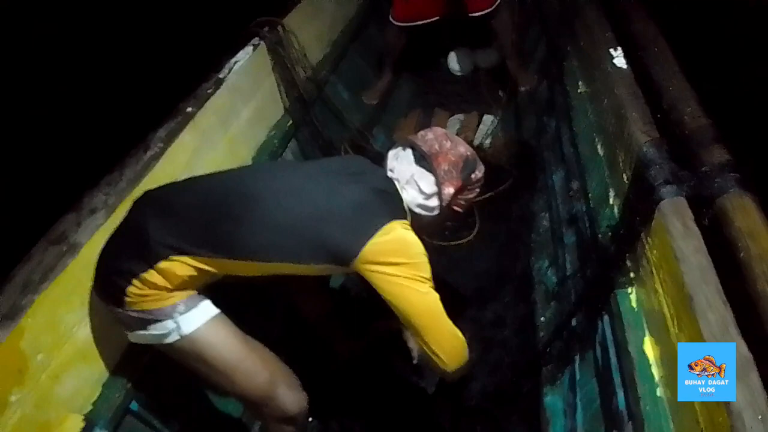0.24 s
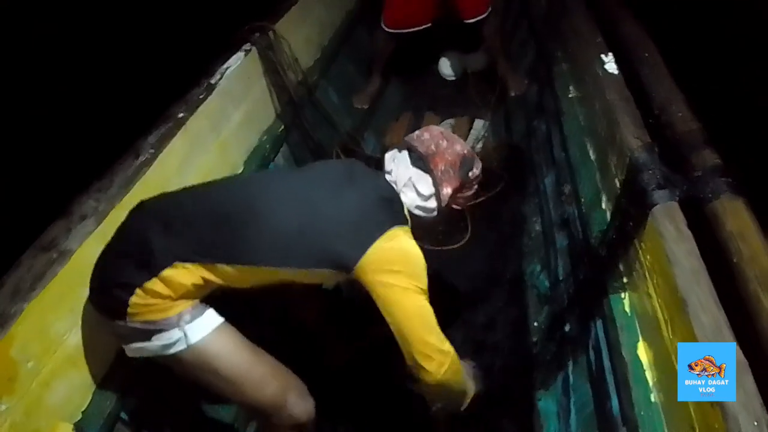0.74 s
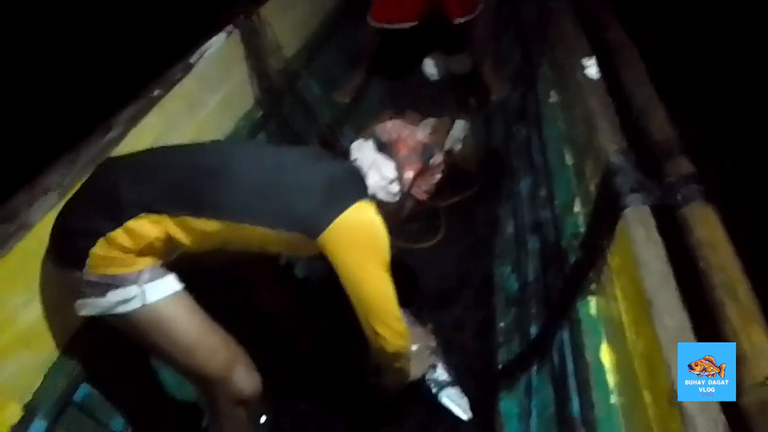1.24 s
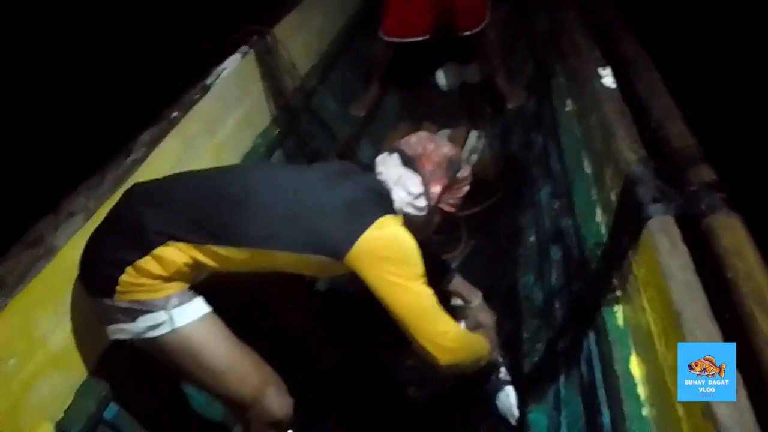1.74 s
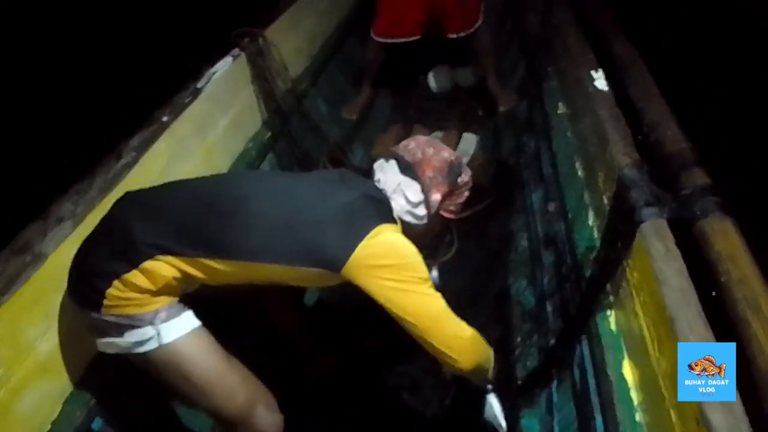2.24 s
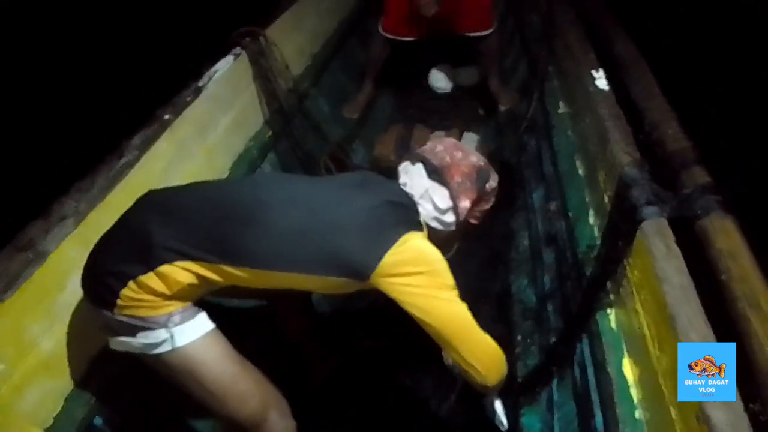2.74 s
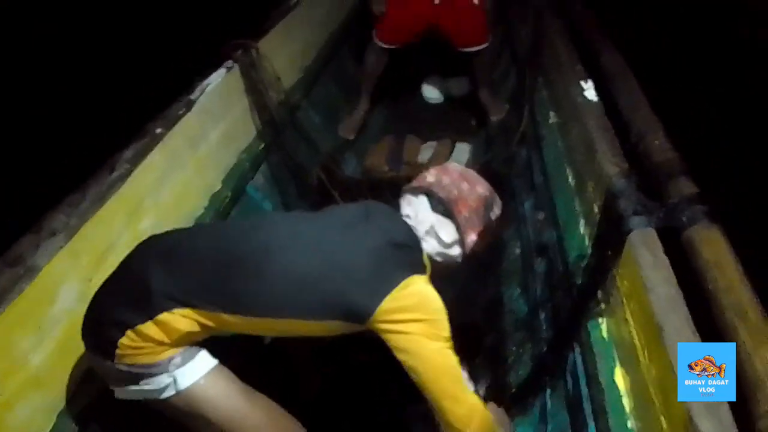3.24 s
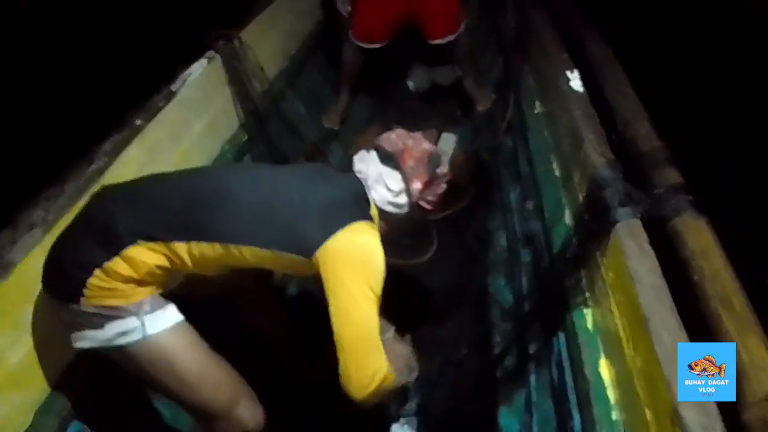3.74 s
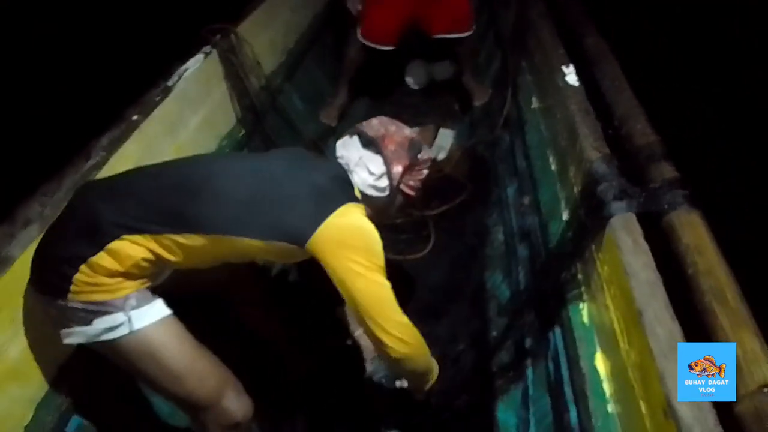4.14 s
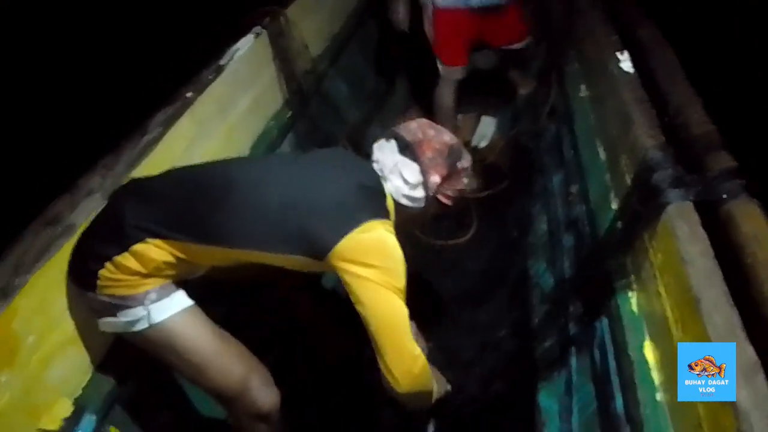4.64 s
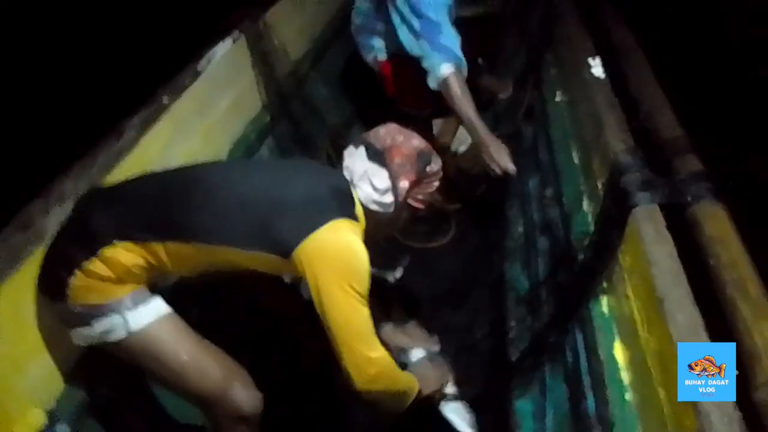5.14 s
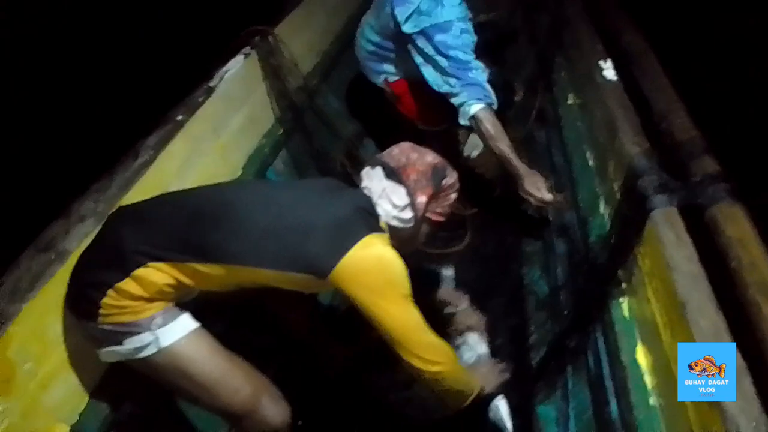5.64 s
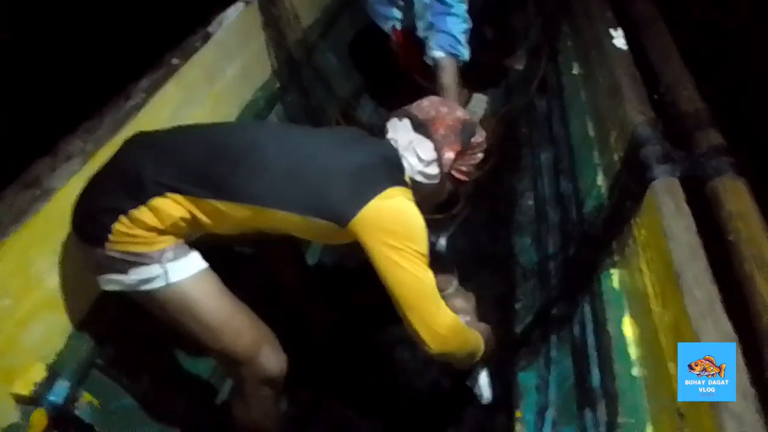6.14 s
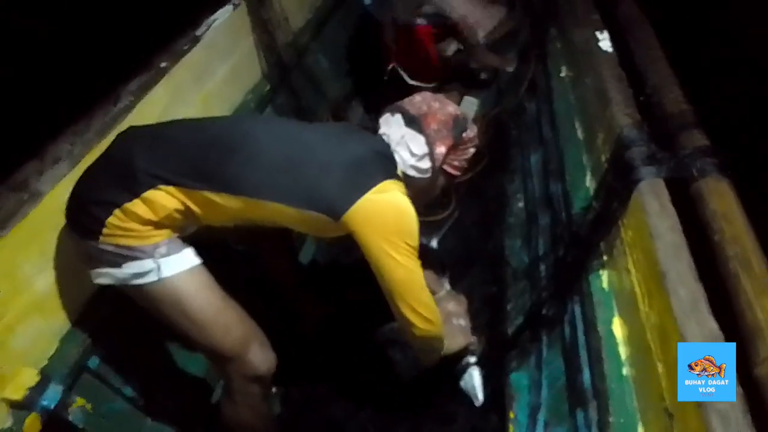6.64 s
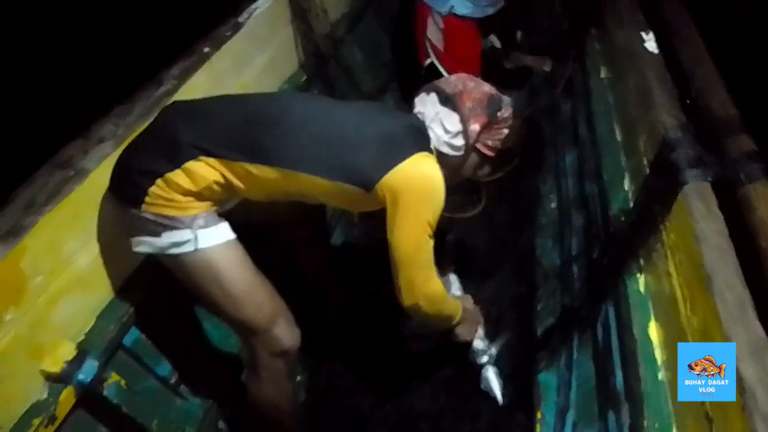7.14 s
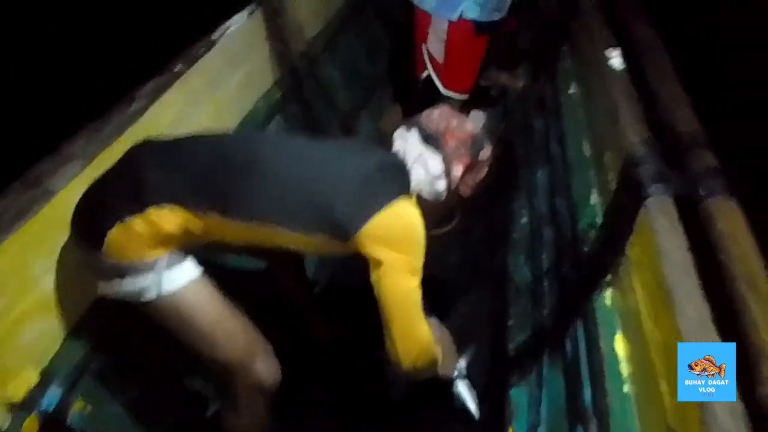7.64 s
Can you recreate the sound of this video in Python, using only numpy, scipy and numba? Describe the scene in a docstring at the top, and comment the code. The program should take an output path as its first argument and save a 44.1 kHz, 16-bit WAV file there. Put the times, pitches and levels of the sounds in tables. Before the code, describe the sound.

Close, slightly boxy mono sound of seawater running off a net inside a small boat. Short splashes alternate with sparse drips, fine bubbles and crackling spray. Later the water pours more heavily while low buffets knock the microphone, then hollow bubbles gurgle and another bright splash falls. Uneven sea and gust rumble lies below, with constant faint hiss.

```python
"""A drop plinks over a trickle, then splash after splash streams off a wet net hauled up a small wooden boat.
The stream is filtered noise, clicks and tiny bubbles, brightened by a camera housing's resonances;
plinks and glugs are gliding damped tones, and single drops add a splat and a bright tick.
Below, noise makes the sea and gusts rumble, and short low tones buffet the microphone port;
a faint whine sounds once, briefly, and a steady hiss lies under it all."""
import sys
import numpy as np
from scipy import signal
from scipy.io import wavfile
from scipy.ndimage import uniform_filter1d
from numba import njit

SR = 44100
rng = np.random.default_rng(int(sys.argv[2]) if len(sys.argv) > 2 else 0)


def generate_wav(sig):
    """Save sig (samples, or channels by samples) to the path in sys.argv[1] as 16-bit PCM at SR."""
    pcm = np.round(np.clip(np.atleast_2d(sig).T, -1, 1) * 32767).astype(np.int16)
    wavfile.write(sys.argv[1], SR, pcm)


N = 347508
FRAME = 512  # spectral frame in samples


def undb(db):
    """Amplitude factor of a level in dB."""
    return 10 ** (np.asarray(db) / 20)


def unit(x):
    """Scale x to an RMS of 1."""
    return x / np.sqrt(np.mean(x ** 2))


def curve(table, s):
    """Columns of a table, interpolated at times s."""
    times, *columns = np.transpose(table)
    return [np.interp(s, times, c) for c in columns]


def slope(points, hz):
    """Level in dB along (f/Hz, level/dB) points, straight over log pitch."""
    f, db = np.transpose(points)
    return np.interp(np.log(hz + 1), np.log(f), db)


def walk(rate_hz):
    """Random levels, each held for 1 / rate_hz seconds and slewed into the next; spread near 1."""
    hold = int(SR / rate_hz)
    steps = np.repeat(rng.standard_normal(N // hold + 1), hold)
    return uniform_filter1d(steps, hold // 2 + 1)[:N]


def patches(shape, wide, long):
    """Random field over pitch and time: bands that stay strong or weak for a while (sizes in bins, frames)."""
    field = uniform_filter1d(rng.standard_normal(shape), int(wide), axis=0)
    field = uniform_filter1d(field, int(long), axis=1)
    return unit(uniform_filter1d(field, int(long) // 3, axis=1))


def colour(x, gain_db, size):
    """Filter x by gain_db(hz, s), which may move in time."""
    overlap = 3 * size // 4
    hz, s, z = signal.stft(x, SR, nperseg=size, noverlap=overlap)
    shaped = z * undb(gain_db(hz[:, None], s))
    return signal.istft(shaped, SR, nperseg=size, noverlap=overlap)[1][:N]


@njit
def ring(n, start, omega, decay, rise, glide, size):
    """Damped tones that swell for a moment, glide in pitch and fade."""
    out = np.zeros(n)
    for k in range(len(start)):
        # the envelope is a slow decay minus a faster one
        slow, fast, w, phase, i = size[k], size[k], omega[k], 0., start[k]
        while slow > .003 * size[k] and i < n:
            out[i] += (slow - fast) * np.sin(phase)
            phase += w
            w *= glide[k]
            slow *= decay[k]
            fast *= rise[k]
            i += 1
    return out


def bubbles(s, hz, db, cycles, glide, rise_share):
    """Bubbles decay at 60 dB per so many cycles, while pitch changes by the share glide; onset is faster."""
    length = cycles * SR / hz
    decay = np.exp(-np.log(1000) / length)
    start = (s * SR).astype(np.int64)
    omega = 2 * np.pi * hz / SR
    return ring(N, start, omega, decay, decay ** (1 / rise_share), (1 + glide) ** (1 / length), undb(db))


def bursts(s, db, tick_s, tail_db, tail_s, lo_hz, hi_hz):
    """A click, then noise in the same band that drops fast and trails off."""
    hits = np.zeros(N)
    hits[(s * SR).astype(int)] = undb(db)
    tick = signal.lfilter([1], [1, -np.exp(-1 / (tick_s * SR))], hits)
    tail = signal.lfilter([1], [1, -np.exp(-1 / (tail_s * SR))], hits)
    band = signal.butter(2, [lo_hz, hi_hz], "band", fs=SR, output="sos")
    noise = unit(signal.sosfilt(band, rng.standard_normal(N)))
    return signal.sosfilt(band, hits) + (tick + undb(tail_db) * tail) * noise


def housing_db(hz):
    """The camera housing resonates and so lifts a few fixed bands."""
    # resonances: f/Hz, width/Hz, lift/dB
    resonances = [(1300, 190, 13), (1828, 250, 6.5), (2510, 86, 3), (4216, 850, 8), (6080, 1950, 5)]
    return sum(db / (1 + (2 * (hz - f) / width) ** 4) for f, width, db in resonances)


def hiss():
    """A steady white noise floor."""
    return undb(-72.5) * rng.standard_normal(N)


def rumble(gust_db=2.5, patchy_db=4.5):
    """Sea and gusts: low noise whose level flutters quickly and whose bands shift in patches."""
    # course of the rumble: t/s, level/dB, upper rumble trim/dB
    course = [(0.0, -41, -22), (0.35, -45.5, -25), (0.57, -28.5, -35), (0.75, -42, -15.5), (1.73, -38, -34),
              (2.02, -46.5, -33), (2.5, -36.5, -23.5), (3.27, -58.5, -15), (4.03, -40, -27.5),
              (4.6, -47, -20), (4.94, -40, -1), (5.29, -37.5, -26.5), (5.44, -30.5, -9), (5.7, -25, -7),
              (5.95, -31, -16), (6.36, -33.5, -12), (6.52, -33, -25), (7.07, -32.5, -28),
              (7.42, -42.5, -1.5), (7.72, -43, -37), (7.82, -32.5, -11)]
    # spectrum of the sea: f/Hz, level/dB
    sea = [(20, 5.5), (32, -16), (55, 5), (100, -2.5), (170, -7.5), (450, -3.5), (600, -44)]
    flutter = walk(30) + .5 * walk(16)
    raw = rng.standard_normal(N) * undb(gust_db * flutter)

    def gain_db(hz, s):
        level_db, upper_db = curve(course, s)
        # the deepest swell grows less than the gusts
        deep = np.clip((70 - hz) / 30, 0, 1) * (-47.5 - level_db) * 0.72
        upper = np.clip((hz - 170) / 100, 0, 1) * upper_db
        shifts = patchy_db * patches((len(hz), len(s)), 2., 4.)
        return slope(sea, hz) + deep + upper - 60 * (hz > 600) + shifts

    level_db = curve(course, np.arange(N) / SR)[0]
    return undb(level_db) * unit(colour(raw, gain_db, size=4 * FRAME))


def buffets():
    """Hard buffets on the microphone port: low tones of a few cycles that sag in pitch."""
    # buffets: t/s, strength/dB, starting f/Hz, cycles to fade
    hits = [(1.732, -16, 106, 7), (2.476, -19.5, 123, 7), (4.871, -12.5, 337, 6.1), (5.036, -17, 346, 7.6),
            (5.104, -18.5, 115, 2.8), (5.385, -18, 234, 15), (5.426, -17, 320, 14), (5.621, -3.5, 264, 2.6),
            (6.022, -18.5, 400, 15), (6.04, -12.5, 148, 3.6), (6.054, -8, 192, 4.3), (6.158, -13, 143, 4.2),
            (6.248, -15, 213, 12.5), (6.333, -12, 136, 8.7), (6.34, -7, 260, 9), (6.424, -12.5, 136, 3.8)]
    s, db, hz, cycles = np.transpose(hits)
    return bubbles(s, hz, db, cycles, -0.24, 0.25)


def whine():
    """One faint, brief thin tone of steady pitch that swells and fades."""
    # tone: t/s, f/Hz, strength/dB, cycles to fade
    tone = [(3.059, 1857, -45.5, 1000)]
    return bubbles(*np.transpose(tone), 0., 0.74)


def glugs():
    """Pockets of trapped air that ring longer and bend in pitch."""
    # glugs: t/s, strength/dB, starting f/Hz, cycles to fade, pitch rise as a share
    pockets = [(0.419, -34, 1150, 43, 0.6), (6.51, -35, 785, 68, 0.23), (6.69, -34.5, 667, 80, -0.05),
               (6.825, -29, 1230, 45, 0.6), (6.95, -48, 646, 69, 0.57), (7.0, -27, 1244, 47, 0.2),
               (7.065, -30, 1142, 89, 0.11), (7.814, -31, 395, 70, -0.16)]
    s, db, hz, cycles, glide = np.transpose(pockets)
    return bubbles(s, hz, db, cycles, glide, 0.23)


def drops(splat_db=-23.5, bell_db=-5.0):
    """Each drop is a dull splat that rings the housing, a bright tick of spray and one bubble."""
    # drops: t/s, level/dB (splat and bubble are trimmed from it), bubble f/Hz, tick re level/dB
    falls = [(0.024, -19.5, 3970, -15), (0.084, -22, 914, -34), (0.6, -52, 4460, 15), (0.727, -47, 1310, 7),
             (0.842, -24.5, 4030, -20.5), (0.9502, -11.5, 2420, -14.5), (0.9955, -22, 1370, 2),
             (1.003, -25, 1350, -18), (1.1658, -23.5, 1300, -11.5), (1.944, -22.5, 1315, -33),
             (2.0547, -29.5, 1540, -49), (2.616, -38, 1310, -3.5), (2.713, -22.5, 2420, -3),
             (2.8308, -26.5, 1530, -1), (2.937, -32, 1860, -18), (2.9661, -29.5, 1490, -14),
             (3.3787, -43.5, 1870, 0.5), (3.495, -26, 1800, -15), (3.561, -22.5, 1760, -22),
             (3.8045, -18, 4080, -9), (3.8336, -15.5, 4840, -23), (3.927, -26.5, 4200, -11.5),
             (4.255, -32, 1310, -7), (4.4629, -25.5, 4360, -13), (4.719, -21.5, 1790, -30),
             (4.9813, -18, 1295, -22), (5.224, -30.5, 1800, -23), (5.9786, -20.5, 1290, -3.5),
             (6.126, -24.5, 2570, -1.5), (6.183, -25, 1100, -31), (6.3727, -21, 1810, -12),
             (7.187, -28.5, 1290, 2), (7.289, -12.5, 1390, -7.5), (7.334, -20, 2580, 0),
             (7.7075, -27, 1330, -0.5), (7.783, -19.5, 1370, -44)]
    s, db, hz, tick_db = np.transpose(falls)
    splats = bursts(s, db + splat_db, 0.0033, -11.5, 0.044, 1200, 4230)
    housed_splats = colour(splats, lambda hz, s: housing_db(hz), size=FRAME)
    ticks = bursts(s, db + tick_db, 0.00026, -6.0, 0.0072, 3900, 8970)
    bells = bubbles(s, hz, db + bell_db, 64.0, 0.024, 0.12)
    return housed_splats + ticks + bells


def water(s):
    """Flow level, slosh and fine spray in dB: powers of the trickle and an arch per splash add up."""
    # trickle between splashes: t/s, level/dB, heavy slosh trim/dB, fine spray trim/dB
    trickle = [(0.06, -33.5, -17.5, -13.5), (0.33, -48, -20.5, -4.5), (0.68, -63.5, -1, -0.5),
               (0.9, -51.5, -5, -18), (1.23, -51, -17, -3.5), (1.5, -51, -9, -18), (2.2, -70.5, -1, -10),
               (2.6, -58.5, -6, -13), (2.92, -55.5, -18.5, -8), (3.33, -68, -6, -16), (3.9, -45, -27, -4.5),
               (4.6, -56, -8, -9.5), (5.0, -40, -0.5, -14.5), (5.33, -56, -14, -11),
               (5.95, -36.5, -10, -12.5), (6.4, -47, -8, -6.5), (6.7, -36.5, -13, -14),
               (7.15, -44.5, -19, -14), (7.45, -37, -8.5, -6), (7.88, -44.5, -40, -16)]
    # splashes: peak t/s, swell/s, fade/s, level/dB, heavy slosh trim/dB, fine spray trim/dB
    splashes = [(0.859, 0.061, 0.022, -41.5, -11, -15), (0.975, 0.055, 0.13, -22.5, -17.5, -13.5),
                (1.055, 0.041, 0.032, -38, -3, -4.5), (1.164, 0.084, 0.071, -41, -7, -6.5),
                (1.769, 0.4, 0.31, -30.5, -22.5, -13), (2.754, 0.14, 0.12, -29.5, -21.5, -6),
                (3.702, 0.31, 0.26, -28, -28.5, -12), (4.72, 0.11, 0.34, -43.5, -31, -4.5),
                (4.844, 0.084, 0.077, -23, -9, -13), (5.23, 0.18, 0.096, -44, -34, -14),
                (5.618, 0.3, 0.16, -22, -5.5, -12.5), (5.81, 0.47, 0.17, -25.5, -3.5, -10.5),
                (6.049, 0.42, 0.03, -35, -1.5, -7.5), (7.215, 0.03, 0.036, -26.5, -16, -8),
                (7.276, 0.073, 0.11, -25.5, -7.5, -3.5)]
    arch_db, arch_power = 43, 1.91  # drop one swell before or one fade after the peak; squareness
    fine_lag_db_per_s = 16.5  # fine spray comes in later than the body: loss per second before the peak
    trickle_db, *trickle_tone = curve(trickle, s)
    power = undb(2 * trickle_db)
    slosh, fine = (power * undb(2 * db) for db in trickle_tone)
    for peak, swell, fade, db, slosh_db, fine_db in splashes:
        away = np.where(s < peak, (peak - s) / swell, (s - peak) / fade)
        arch = undb(2 * (db - arch_db * np.minimum(away, 3) ** arch_power))
        late_fine_db = fine_db - fine_lag_db_per_s * np.clip(peak - s, 0, 1)
        power = power + arch
        slosh = slosh + arch * undb(2 * slosh_db)
        fine = fine + arch * undb(2 * late_fine_db)
    return 10 * np.log10([power, slosh / power, fine / power])


def gurgle(count=500, below_db=0.0, spread_db=4.0):
    """Separate bubbles plink with quick glides, louder where the water runs and the housing resonates."""
    when, pitch, size, life, bend = rng.random((count, 5)).T
    s = when * N / SR
    hz = 850 * 4.5 ** pitch ** 1.3
    size_db = -spread_db * np.log(1 - 0.66 * size)
    db = water(s)[0] + below_db + size_db + 1.14 * housing_db(hz)
    return bubbles(s, hz, db, 20 + 30 * life, 0.68 * bend - .15, 0.52)


def droplets(count=9000, spread_db=2.5, tilt_db=5.5):
    """Tiny bubbles of many pitches at random, ringing for some 5 to 30 cycles; a few stand far out."""
    when, pitch, size, life, bend = rng.random((count, 5)).T
    hz = 500 * 22 ** pitch
    db = tilt_db * np.log2(hz / 1000) - spread_db * np.log(1 - .98 * size)  # tilt is per octave
    return unit(bubbles(when * N / SR, hz, db, 5 + 25 * life, .5 * bend - .1, 0.017))


def stream(rate_hz=700., spread_db=0.5, crackle_db=-2.0, fizz_db=-3, sputter_db=3.0,
           patchy_db=5.0, notch_db=26.0, flicker_db=1.0, drift=0.035):
    """Droplets, uneven clicks and fizz; the flow sputters and its colour shifts in patches."""
    # spectrum of the spray: f/Hz, level/dB
    spray = [(450, -4), (820, 4), (1200, -11), (2000, -6.5), (3300, -10), (4200, -8), (8800, 0),
             (10200, -13), (16000, -4.5)]
    chance = rng.random((N, 2)).T
    click_size = undb(-spread_db * np.log(1 - .97 * chance[1])) * rng.standard_normal(N)
    clicks = (chance[0] < rate_hz / SR) * click_size
    fizz = undb(fizz_db) * rng.standard_normal(N)
    raw = droplets() + fizz + undb(crackle_db) * unit(clicks)
    knots = np.arange(0, N, 64)  # the flow is computed every 64 samples
    flow_db = np.interp(np.arange(N), knots, water(knots / SR)[0])
    # a full stream runs more evenly than a trickle
    uneven = np.clip((-23.0 - flow_db) / 36.3, .3, 1)
    raw = raw * undb(sputter_db * uneven * (walk(60) + 1.2 * walk(32)))

    def gain_db(hz, s):
        level_db, slosh_db, fine_db = water(s)
        thin = np.clip((-13 - level_db) / 17.6, .25, 1)
        low = np.clip((1150 - hz) / 230, 0, 1)
        high = np.clip((hz - 2100) / 3000, 0, 1)
        shape = len(hz), len(s)
        # the lifted bands wander a little in pitch
        wander = 1 + drift * patches(shape, 13.0, 22.0)
        # narrow bands drop out for a while and wide ones flicker
        holes = -notch_db * np.clip(patches(shape, 1.8, 108.4) - .7, 0, None)
        shimmer = patchy_db * patches(shape, 2., 53.0) + flicker_db * patches(shape, 18., 6.)
        # a full rush evens these shifts and the upper lifted bands out
        shifts = thin * (shimmer + holes)
        lift = housing_db(hz * wander) * np.where(hz > 2100, np.maximum(thin, .4), 1)
        body = slope(spray, hz) - 60 * (hz < 400)
        return body + lift + low * slosh_db + high * fine_db + shifts

    return undb(flow_db) * unit(colour(unit(raw), gain_db, size=FRAME))


def scene():
    """Sum the background, the air and drops, and the streaming water in one channel."""
    background = hiss() + rumble() + buffets() + whine()
    return (background + glugs() + drops() + gurgle() + stream())[None]


def record(dry):
    """The camera cuts the top steeply above 15.8 kHz."""
    return signal.sosfilt(signal.ellip(10, .2, 60, 15800, fs=SR, output="sos"), dry)


dry = scene()
out = record(dry)
generate_wav(out)
```